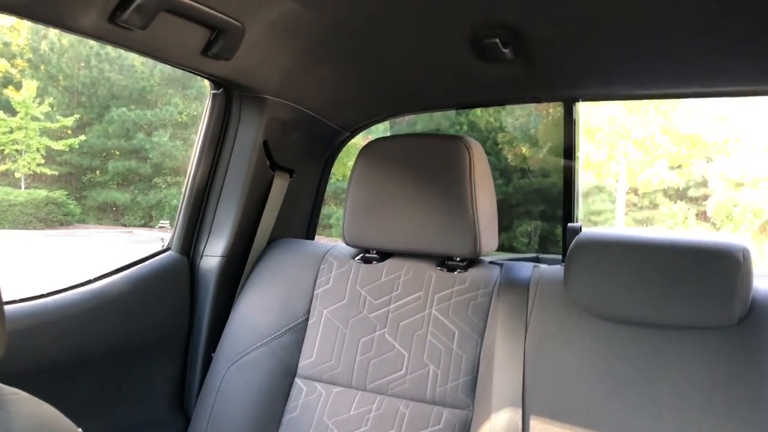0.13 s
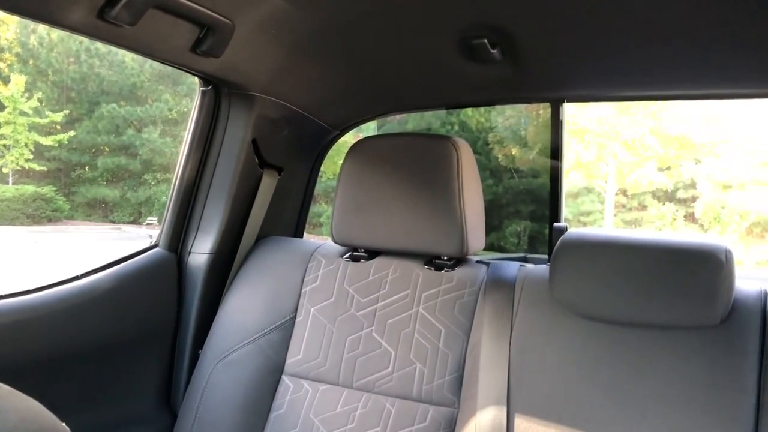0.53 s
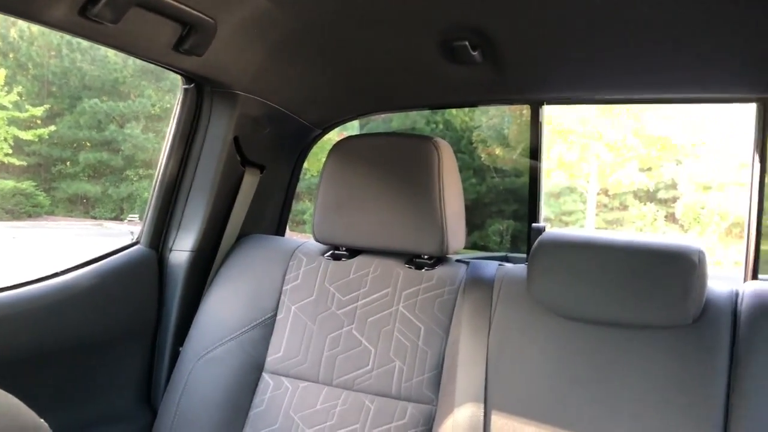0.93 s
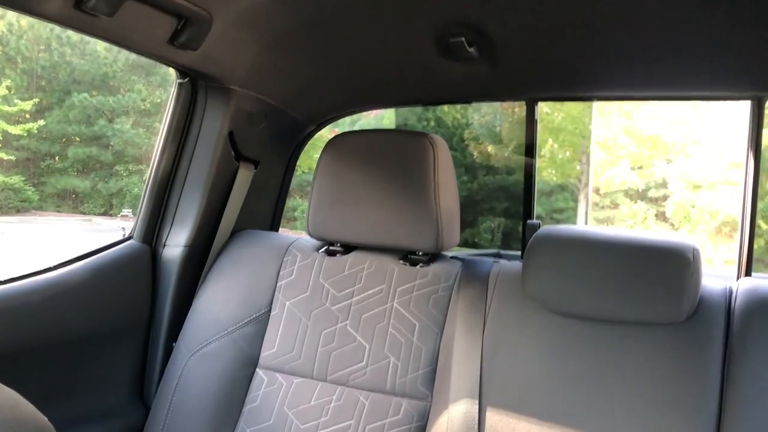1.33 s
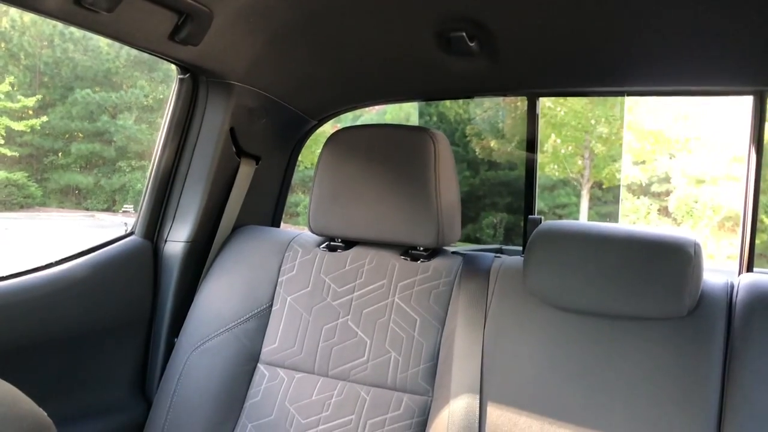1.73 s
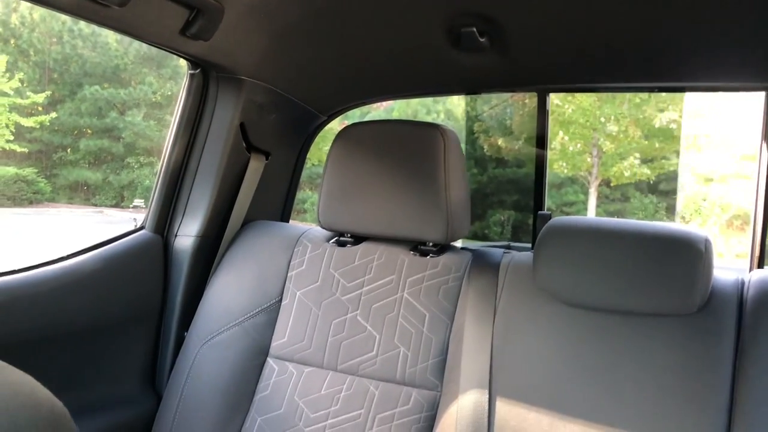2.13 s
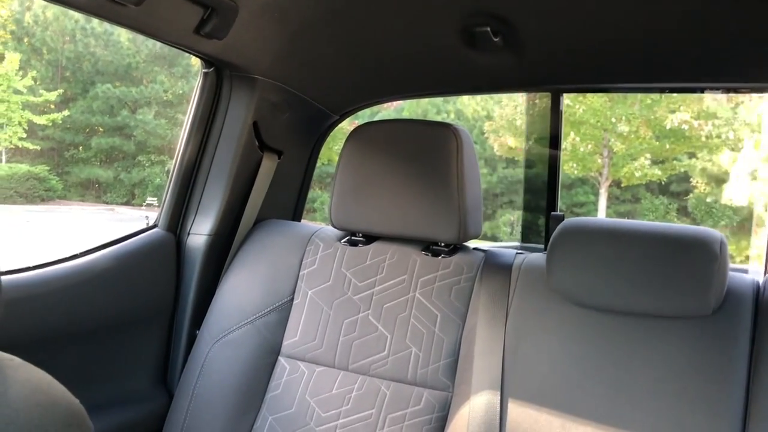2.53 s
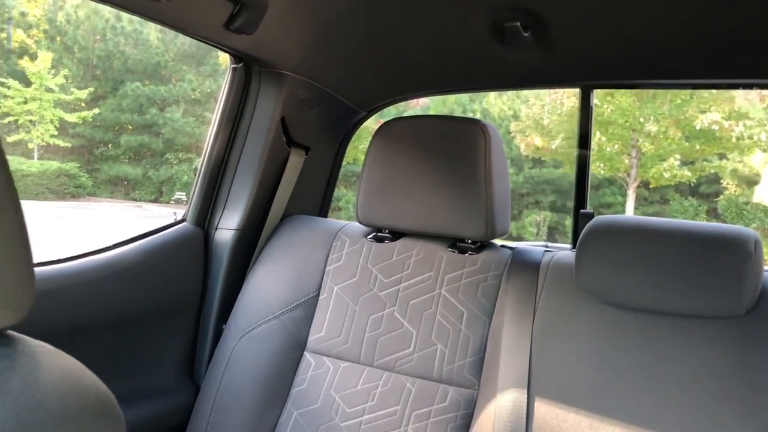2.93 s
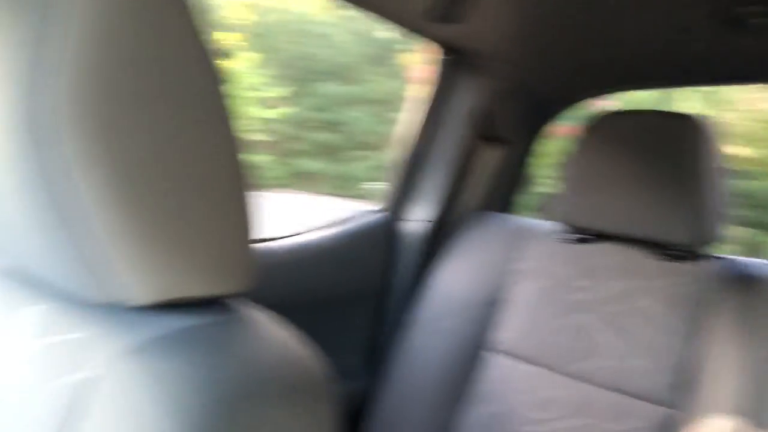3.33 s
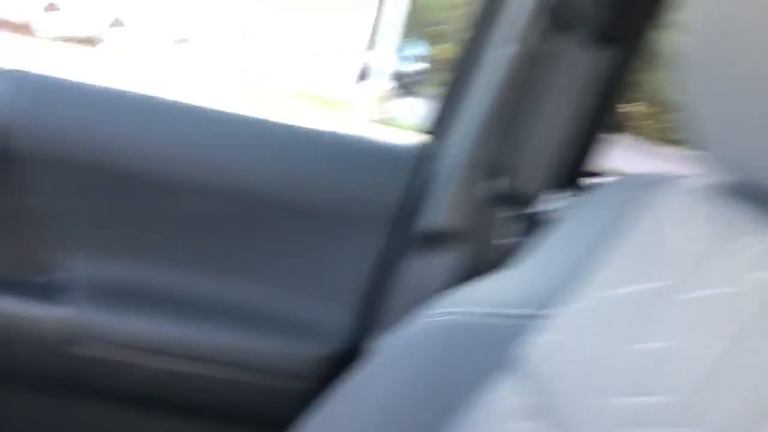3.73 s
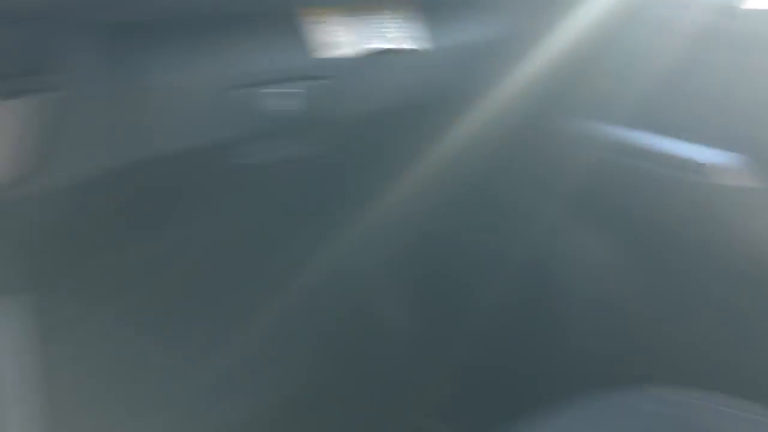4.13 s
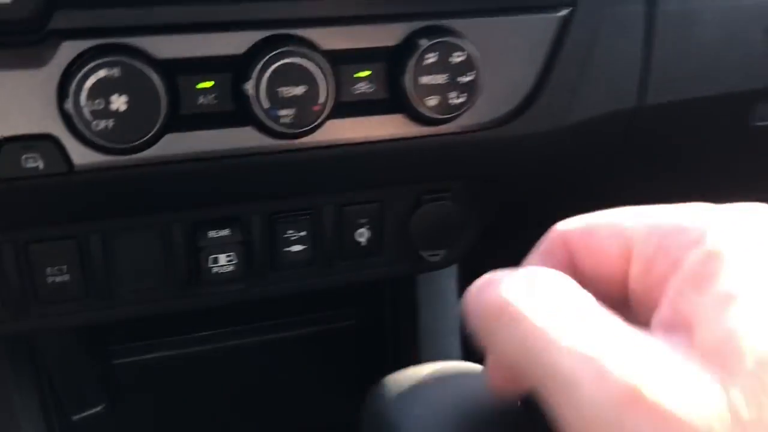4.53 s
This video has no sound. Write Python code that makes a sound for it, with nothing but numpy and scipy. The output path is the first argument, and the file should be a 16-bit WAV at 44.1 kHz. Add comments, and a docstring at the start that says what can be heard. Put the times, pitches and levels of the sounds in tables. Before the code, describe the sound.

Close, dry phone pickup inside an idling pickup. A motor hum cuts off at a hard plastic knock; small clicks and taps follow, then a rubbery slip and tiny squeak. The motor hums with a thin whine while glass slides, pauses briefly, resumes, and ends in a firm clack. Lastly come soft cloth rustle, rising air and low fumbling thumps on the phone.

```python
"""In the cab of an idling pickup, on a hand-held phone: the power rear window slides shut with a knock,
then pulls out of its seal and opens in two runs to its end stop. Tones make the motor and engine; shaped
noise makes the pane's hiss in its felt channel; ringing modes make the knocks, short noise bursts the
clicks of dash switch and relay. Then the phone swings round: a sleeve rustles, dash air grows and fingers
bump the case."""
import sys
import numpy as np
from scipy import signal
from scipy.fft import rfft, irfft
from scipy.io import wavfile
from scipy.ndimage import uniform_filter1d

SR = 44100
rng = np.random.default_rng(int(sys.argv[2]) if len(sys.argv) > 2 else 0)


def to_wav(s):
    """Save 16-bit WAV."""
    ch = np.atleast_2d(s).T  # columns
    pcm = np.round(np.clip(ch, -1, 1) * 32767)  # PCM
    wavfile.write(sys.argv[1], SR, pcm.astype(np.int16))


N = 207132
T = np.arange(N) / SR
HIT_T = T[:SR // 2]  # time within one short event

# colour of cracking plastic and of grit: hz, level_db
CRACK_COLOUR = [(500, 13), (1000, 6), (1500, -2.5), (2000, 5.5), (2900, 1.5), (3500, -0.5), (4300, 3),
                (5500, -39), (7500, -43), (11000, -43), (15500, -60)]


def undb(db):
    """Decibels to gain."""
    return 10 ** (np.asarray(db) / 20)


def curve(rows):
    """The second column of a table, joined by straight lines over the seconds in the first."""
    s, value = np.transpose(rows)
    return np.interp(T, s, value)


def noise(points, size=N):
    """Unit-rms noise with a spectrum of (Hz, dB) points, falling steeply outside them."""
    hz, db = np.transpose(points)
    f = np.maximum(np.arange(size // 2 + 1) * SR / size, 1)
    gain = undb(np.interp(np.log(f), np.log(hz), db))
    gain *= np.minimum(f / hz[0], 1) ** 3
    gain *= np.minimum(hz[-1] / f, 1) ** 3
    x = irfft(rfft(rng.standard_normal(size)) * gain, size)
    return x / x.std()


def walk(rate):
    """Smooth random wander of unit spread, with about `rate` new values a second."""
    k = max(int(SR / rate), 2)
    steps = np.repeat(rng.standard_normal(N // k + 1), k)[:N]
    x = uniform_filter1d(uniform_filter1d(steps, k), k)
    return x / x.std()


def tone(hz):
    """Unit-rms sine on a pitch curve."""
    return np.sqrt(2) * np.sin(2 * np.pi * np.cumsum(hz) / SR)


def swell(t, rise, t60):
    """Linear rise from t = 0, then an exponential decay."""
    return np.clip(t / rise, 0, 1) * np.exp(-np.log(1000) * np.maximum(t - rise, 0) / t60)


def burst(points, rise, t60):
    """A coloured noise burst that swells and dies away."""
    return swell(HIT_T, rise, t60) * noise(points, size=len(HIT_T))


def ring(modes, contact_hz):
    """Decaying modes after one blow; a soft contact weakens those above its cut-off."""
    out = np.zeros(len(HIT_T))
    for hz, db, t60 in modes:
        decay = undb(db - 60 * HIT_T / t60)
        out += decay * np.sin(2 * np.pi * hz * HIT_T) / np.hypot(1, (hz / contact_hz) ** 2)
    return out


def roll_off(x, hz, kind, order=2):
    """Butterworth low-pass or high-pass."""
    return signal.sosfilt(signal.butter(order, min(hz, SR / 2 - 1), kind, fs=SR, output="sos"), x)


def add(out, s, x):
    """Mix x into out from time s."""
    i = int(s * SR)
    out[i:i + len(x)] += x[:N - i]


def cab(x, wet_db, t60):
    """The upholstered cab turns part of a sound into a very short wash of reflections."""
    tail = burst([(300, 16.5), (2000, -3.5), (15000, -8.5)], rise=0.0011, t60=t60)
    wet = signal.fftconvolve(x, tail / np.sqrt(np.sum(tail ** 2)))[:N]
    return (x + undb(wet_db) * wet) / np.hypot(1, undb(wet_db))


def idle():
    """Wavering tones at multiples of the engine's firing rate, over a dull cabin background."""
    # engine tones, before the boom curve: multiple of the firing rate, level_db
    engine_tones = [(0.5, -63), (0.748, -54), (0.999, -45), (1.499, -88), (2, -48), (2.5, -51.5), (3, -54),
                    (4, -56.5)]
    # the idle booms less where the phone passes the middle of the cab: s, gain_db
    boom = [(3.6, -4), (3.8, -12), (4.1, -17), (4.3, 3)]
    # colour of the cabin background: hz, level_db
    cabin_colour = [(35, -27), (60, -12.5), (76, -9.5), (135, -1), (156, -8), (192, -9), (231, -15.5),
                    (305, -14.5), (327, -20.5), (368, -19), (453, -28), (497, -26), (1630, -38.5),
                    (2310, -47.5), (15500, -66)]
    firing_hz = 51.07 * (1 + 0.00328 * walk(4.115))
    # the higher multiples waver more in level
    engine = sum(undb(db + k * walk(9)) * tone(k * firing_hz) for k, db in engine_tones)
    cabin = undb(-45 + 0.5 * walk(8.3)) * noise(cabin_colour)
    return undb(curve(boom)) * engine + cabin


def motor(hum_hz, hum_db, whine_hz, whine_gain):
    """The drive hums with faint harmonics, and its commutator adds a thin, unsteady whine."""
    hum_hz = hum_hz * (1 + 0.00775 * walk(25.35))
    hum = undb(hum_db + 1.2 * walk(13)) * (tone(hum_hz) + undb(-33.0) * tone(3 * hum_hz))
    # the octave keeps its own faint, wavering level
    octave = undb(-58 + 2 * walk(11.0)) * tone(2 * hum_hz)
    whine_hz = whine_hz * (1 + 0.00292 * walk(39.9) + 0.00398 * walk(7))
    whine = whine_gain * undb(2 * walk(16)) * (tone(whine_hz) + undb(-12) * tone(2 * whine_hz))
    return hum + octave + whine


def pane(friction_db, rumble_db=7.5):
    """Glass rubs in its felt channel: a grainy hiss with close reflections, specks of grit, low rumble."""
    # colour of the hiss: hz, level_db
    felt_colour = [(900, -9), (1300, -17.5), (1750, -11), (2000, -14.5), (2900, -11.5), (3500, -14),
                   (4100, -11), (4900, -12), (6200, -17.5), (7200, -20), (9900, -21), (11000, -25),
                   (15500, -30.5)]
    # colour of the rumble: hz, level_db
    channel_colour = [(150, -8.5), (240, 2.5), (300, -26.5), (480, -9), (600, -18), (800, -21.5),
                      (1100, -60)]
    grit_per_s, grit_db = 70, -10  # level relative to the friction
    grip_db = 0.27 * walk(60) + 2 * walk(900)
    felt = cab(undb(friction_db + grip_db) * noise(felt_colour), wet_db=0, t60=0.094)
    rumble = undb(friction_db + rumble_db + walk(30.36)) * noise(channel_colour)
    specks = (rng.random(N) < grit_per_s / SR) * rng.standard_normal(N)
    grit = signal.fftconvolve(specks, burst(CRACK_COLOUR, rise=0.0024, t60=.025))[:N]
    return felt + rumble + undb(friction_db + grit_db) * grit / grit.std()


def drive():
    """Motor and pane sound only while the window runs, and coast briefly after each stop."""
    # motor runs: start_s, stop_s, coast_s, first_hum_hz, last_hum_hz, friction_db,
    # bind_db (friction change at the stop), whine_db, whine_build_s
    runs = [(-.1, 0.278, 0.015, 133.3, 130.2, -60, 10.5, -65, 0.53),
            (1.059, 1.663, 0.019, 111.3, 119.9, -59.5, -2.5, -62, 0.29),
            (1.902, 2.83, 0.012, 122.9, 131.1, -60.5, 7, -66, 0.11)]
    # uneven, beating level of the drive hum, one table a run: s, level_db
    hum_levels = [
        [(0, -38.5), (.09, -34), (.158, -51), (.19, -36), (.25, -36.5)],
        [(1.11, -38.5), (1.196, -57), (1.254, -35), (1.38, -53), (1.454, -34), (1.532, -48.5), (1.65, -44)],
        [(1.92, -41.5), (2.096, -42), (2.21, -35.5), (2.35, -47.5), (2.62, -32), (2.68, -27.5), (2.82, -27)],
    ]
    # friction is higher as the pane breaks loose, and changes again at the end of its travel
    breakaway_db, breakaway_s, bind_s = 3.5, 0.074, 0.074
    # the whine builds up after each start and later fades; its pitch sinks slowly throughout
    whine_start_hz, whine_sag_hz_per_s, whine_t60_s = 899, 11.25, 11
    out = np.zeros(N)
    for run, hum_level in zip(runs, hum_levels):
        start, stop, coast, first_hz, last_hz, friction_db, bind_db, whine_db, build = run
        since, left = np.maximum(T - start, 0), np.maximum(stop - T, 0)
        coasting = np.exp(-np.maximum(T - stop, 0) * 2 / coast)
        running = np.minimum(since / 0.0091, 1) * coasting
        hum_hz = np.interp(T, [start, stop], [first_hz, last_hz])
        whine_hz = whine_start_hz - whine_sag_hz_per_s * since
        whine_gain = undb(whine_db) * swell(since, build, whine_t60_s) * np.minimum(since / build, 1)
        drag_db = friction_db + breakaway_db * np.exp(-since / breakaway_s)
        drag_db += bind_db * np.exp(-left / bind_s)
        out += running * (motor(hum_hz, curve(hum_level), whine_hz, whine_gain) + pane(drag_db))
    return out


def seal():
    """The pane drags through its rubber seal in small slips, and leaves it with a short rising squeak."""
    # slips in the rubber: peak_s, level_db, t60_s
    slip_times = [(.086, -51.5, 0.031), (0.176, -50, 0.052), (0.946, -47.5, 0.44), (1.003, -54, 0.15),
                  (1.065, -44.5, 0.046)]
    # colour of dragged rubber: hz, level_db
    rubber_colour = [(150, 5), (300, -1), (700, -1.5), (1000, -8), (1400, -8), (2200, -13), (5000, -30.5),
                     (12000, -44)]
    rise_s = 0.022
    slips = sum(undb(db) * swell(T - s + rise_s, rise_s, t60) for s, db, t60 in slip_times)
    drag = slips * undb(1.8 * walk(150)) * noise(rubber_colour)
    squeak_at_s, squeak_length_s, squeak_db = 1.057, 0.032, -38
    squeak_start_hz, glide_hz_per_s = 620, 1200
    age = np.clip(T - squeak_at_s, 0, squeak_length_s)
    hz = (squeak_start_hz + glide_hz_per_s * age) * (1 + .02 * walk(200))
    arch = np.sqrt(np.abs(np.sin(np.pi * age / squeak_length_s)))
    return drag + undb(squeak_db) * arch * tone(hz)


def blow(contact_hz, favoured_hz, accent_db=6, accent_octaves=0.34, trim_db=-7):
    """One blow rings the pane and frame, most near the favoured pitch, and shakes the trim."""
    # pane and frame modes, before the accent: hz, level_db, t60_s
    frame_modes = [(108.1, -4.5, 0.57), (128.8, 7, 0.15), (173.9, 0, 0.22), (207.2, 0, 0.15),
                   (268, -12, 0.11), (326, -5, 0.073), (428, 1, 0.039), (437, -17, 0.081),
                   (552, -22, 0.076), (587, -7.5, 0.048), (748, -20, 0.03), (990, -32, 0.051),
                   (1028, -57, 0.028), (1424, -11, 0.032), (1930, -16, 0.075), (2370, -39, 0.049),
                   (2700, -37, .06), (4000, -34, 0.081)]
    # colour of the trim panels shuddering with each blow: hz, level_db
    trim_colour = [(80, -25), (200, 3.5), (450, -15), (800, -6), (1200, -14)]
    modes = []
    for hz, db, t60 in frame_modes:
        octaves_away = np.log2(hz / favoured_hz)
        modes.append((hz, db + accent_db * np.exp(-(octaves_away / accent_octaves) ** 2), t60))
    trim = roll_off(burst(trim_colour, rise=0.01, t60=0.097), 1.04 * contact_hz, "low")
    return roll_off(ring(modes, contact_hz) + undb(trim_db) * trim, 2.03 * contact_hz, "low")


def crack(favoured_hz):
    """A short plastic crack; the guides ring at a multiple of the pitch favoured by the place struck."""
    guide_multiple, guide_q, guide_db = 3.74, 4.4, 3
    snap = burst(CRACK_COLOUR, rise=0.002, t60=0.025)
    peak = signal.iirpeak(min(guide_multiple * favoured_hz, SR / 2 - 1), guide_q, fs=SR)
    return snap + undb(guide_db) * signal.lfilter(*peak, snap)


def knocks():
    """Each knock is a hard tap with a crack of the plastic guides, then the soft thud of the pane's weight."""
    # knocks on the frame: s, tap_db, favoured_hz (set by the place struck), thud_db, crack_db
    knock_times = [(0.2711, -33.5, 436, -31, -47), (0.2774, -29.5, 706, -41, -36.5),
                   (0.6147, -47.5, 1400, -58, -65.5), (.690, -42, 1370, -44, -50.5),
                   (0.9377, -42, 1470, -38, -57), (1.013, -39.5, 600, -40, -74),
                   (1.0575, -36, 1890, -35, -53), (1.660, -44.5, 620, -51, -59),
                   (1.925, -57, 500, -47.5, -57), (2.8299, -31.5, 1030, -29, -36.5),
                   (2.8484, -43, 1020, -42, -56.5), (2.8562, -32.5, 520, -39.5, -75),
                   (3.276, -45.5, 320, -48, -77), (3.553, -44.5, 840, -49, -70)]
    thud_lag_s, thud_contact_hz, thud_pitch_hz = 0.00507, 207, 186
    # edges of the band a tap excites, as multiples of its favoured pitch
    low_edge, high_edge = 0.43, 1.4
    out = np.zeros(N)
    for s, tap_db, favoured_hz, thud_db, crack_db in knock_times:
        tap = blow(high_edge * favoured_hz, favoured_hz)
        tap = roll_off(tap, low_edge * favoured_hz, "high", order=1)
        add(out, s, undb(tap_db) * tap + undb(crack_db) * crack(favoured_hz))
        add(out, s + thud_lag_s, undb(thud_db) * blow(thud_contact_hz, thud_pitch_hz))
    # the knocks are kept free of deep bass
    return roll_off(out, 86, "high")


def switch_and_relay():
    """The dash switch clicks, and a relay ticks sharply as the window shuts: bursts of coloured noise."""
    # clicks and ticks: s, level_db, t60_s
    click_times = [(0.2777, -33.5, 0.0093), (0.3102, -39.5, 0.013), (.686, -51, .07), (0.93, -52, .09),
                   (.985, -56, 0.04), (1.646, -46.5, 0.046), (1.91, -52, 0.052), (2.782, -38.5, .04),
                   (2.812, -51, .075), (3.265, -49, .059)]
    # colour of the clicks, before thinning: hz, level_db
    click_colour = [(400, -22), (1400, 10.5), (2200, 6), (3700, 0), (4600, 1.5), (5800, -2), (7500, -3),
                    (10000, -7.5), (13000, -13), (15500, -16)]
    # the rise is a share of the t60; shorter clicks are thinner:
    # the lower knee fits this many cycles into the t60
    rise_share, knee_cycles = 0.071, 136
    out = np.zeros(N)
    for s, db, t60 in click_times:
        click = burst(click_colour, rise_share * t60, t60)
        add(out, s, undb(db) * roll_off(click, knee_cycles / t60, "high", order=1))
    return out


def sleeve():
    """A sleeve rustles as the arm turns the phone: fluttering noise on a level curve."""
    # rustle of the moving arm: s, level_db
    arm = [(2.98, -84), (3.12, -67.5), (3.3, -76.5), (3.6, -69), (3.94, -65), (4.14, -71), (4.49, -62),
           (4.58, -70), (4.69, -64.5)]
    # colour of the cloth: hz, level_db
    cloth_colour = [(1060, -39), (1800, -3.5), (2400, -3.5), (2820, -3.5), (3700, -6), (5650, -7),
                    (7020, -9.5), (15500, -17)]
    return undb(curve(arm) + 0.81 * walk(82)) * noise(cloth_colour)


def vent():
    """Air from the dash, as coloured noise, grows steadily as the phone turns towards it."""
    # colour of the air: hz, level_db
    air_colour = [(100, -35), (250, 3), (500, 0), (800, -4.5), (1100, -10), (1500, -10.5), (2200, -24),
                  (4000, -29.5)]
    turn_at_s, start_db, db_per_s = 3.225, -65, 9
    turned = np.maximum(T - turn_at_s, 0)
    return np.minimum(turned / .05, 1) * undb(start_db + db_per_s * turned) * noise(air_colour)


def bump(contact_hz):
    """One finger contact: a ring of the case, damped by the finger, and a low wobble in the hand."""
    # phone case modes, before the finger damps them: hz, level_db, t60_s
    case_modes = [(67, -5, 0.26), (107, 2, 0.037), (173, 7.5, 0.068), (284, -2, 0.044), (350, -34, 0.019),
                  (450, 1.5, 0.027), (512, 0, 0.027)]
    finger_damp_t60_s = 0.097
    wobble_hz, wobble_db, wobble_t60_s = 68, 0.5, 0.08
    case = ring(case_modes, contact_hz) * undb(-60 * HIT_T / finger_damp_t60_s)
    wobble = ring([(wobble_hz, wobble_db, wobble_t60_s)], contact_hz)
    return roll_off(case + wobble, 380 + 0.32 * contact_hz, "low", order=4)


def finger_bumps():
    """Fingers bump the phone's case; every finger touches, presses and settles in uneven time."""
    # finger bumps: s, level_db, contact_hz (cut-off, before the share of each stage)
    bump_times = [(4.308, -25.5, 290), (4.3226, -25, 575), (4.353, -28, 280), (4.373, -26, 200),
                  (4.387, -26, 536), (4.454, -36, 525), (4.463, -29, 180), (4.516, -32.5, 430),
                  (4.565, -29, 1420), (4.584, -25, 130), (4.617, -31, 430), (4.6429, -32.5, 676),
                  (4.671, -42, 326)]
    # stages of a bump: nominal lag_s, level_db, share of the contact cut-off
    finger_stages = [(-.009, -6, 0.5), (0, 1, 0.66), (.008, -1, .4)]
    out = np.zeros(N)
    for s, db, contact_hz in bump_times:
        for lag, stage_db, share in finger_stages:
            uneven_lag = lag * (1 + 0.14 * rng.standard_normal())
            add(out, s + uneven_lag, undb(db + stage_db) * bump(share * contact_hz))
    return out


def scene():
    """Everything at the one microphone: knocks, seal and clicks get the cab's reflections here."""
    window = drive() + cab(knocks() + seal(), wet_db=-13.5, t60=0.1)
    clicks = cab(switch_and_relay(), wet_db=-9.5, t60=0.074)
    handling = sleeve() + vent() + finger_bumps()
    return (window + clicks + idle() + handling)[None]


def record(dry):
    """The phone cuts the deepest bass, and the top above 15.8 kHz."""
    bass_cut = roll_off(dry, 43, "high", order=3)
    top_cut = signal.ellip(10, .2, 80, 15800, fs=SR, output="sos")
    return signal.sosfilt(top_cut, bass_cut)


dry = scene()
out = record(dry)
to_wav(out)
```